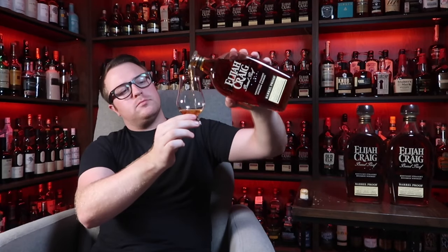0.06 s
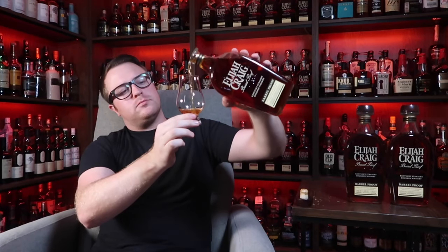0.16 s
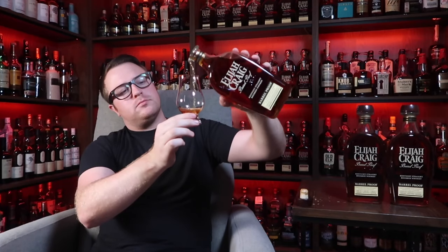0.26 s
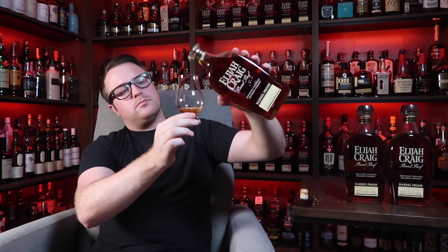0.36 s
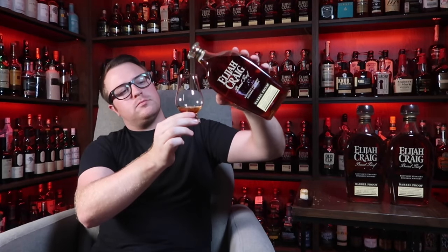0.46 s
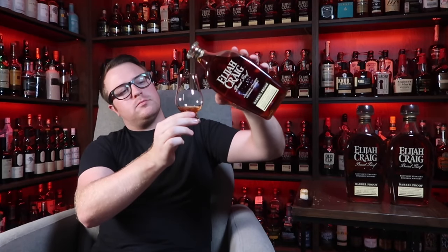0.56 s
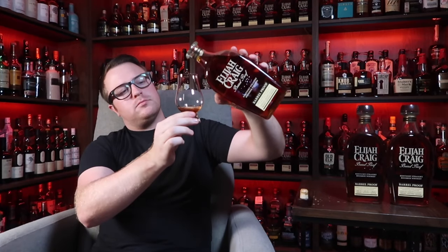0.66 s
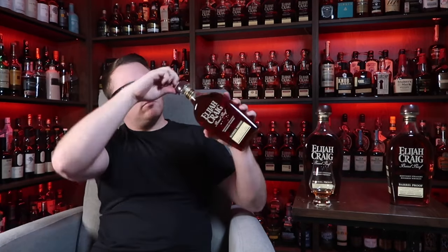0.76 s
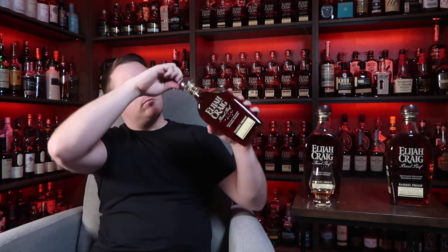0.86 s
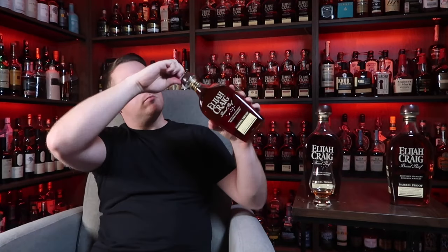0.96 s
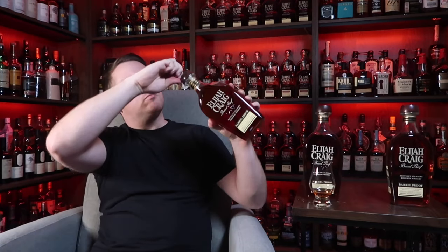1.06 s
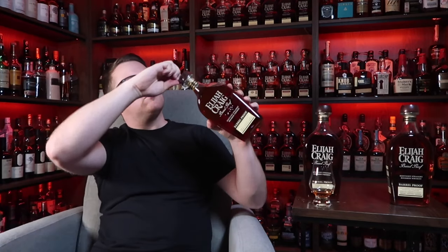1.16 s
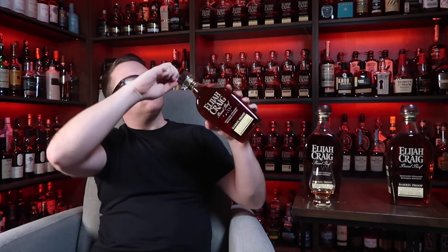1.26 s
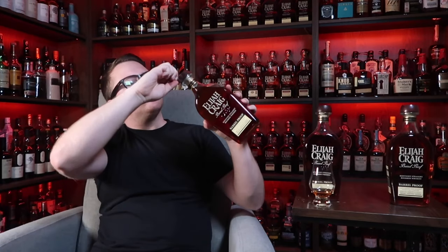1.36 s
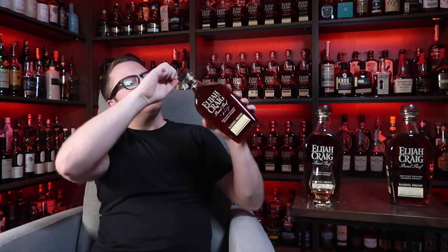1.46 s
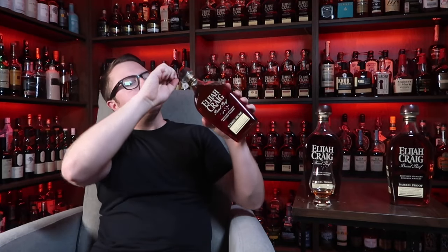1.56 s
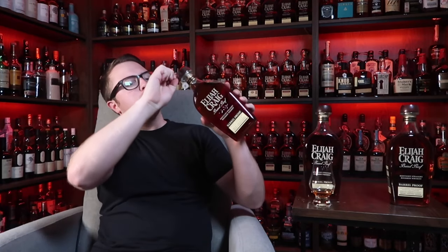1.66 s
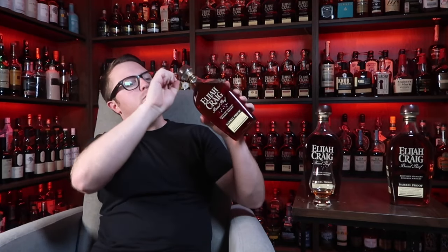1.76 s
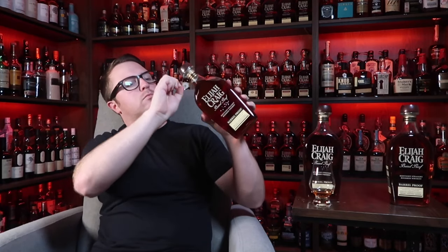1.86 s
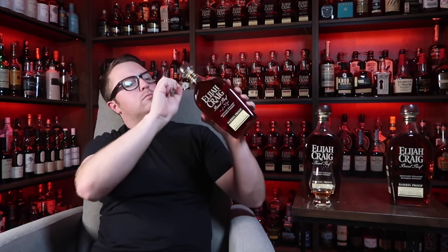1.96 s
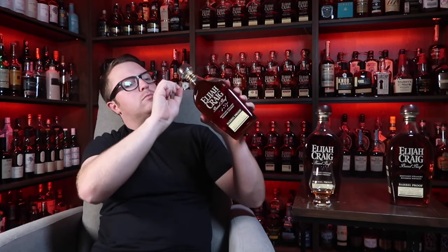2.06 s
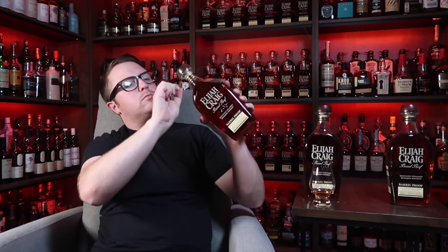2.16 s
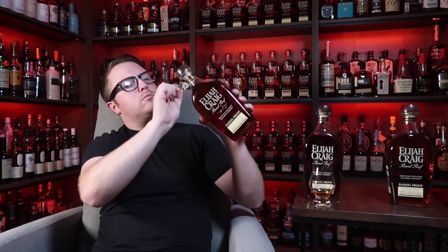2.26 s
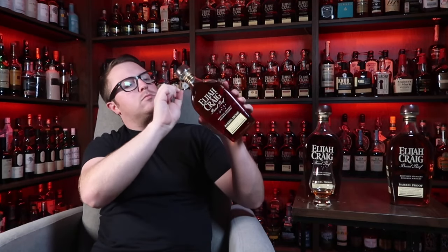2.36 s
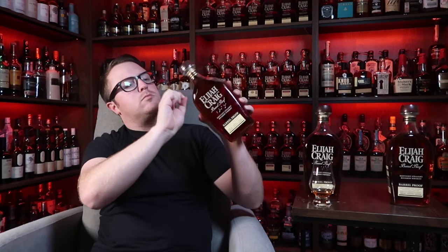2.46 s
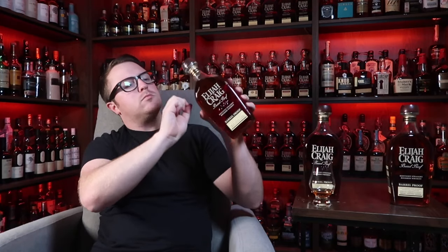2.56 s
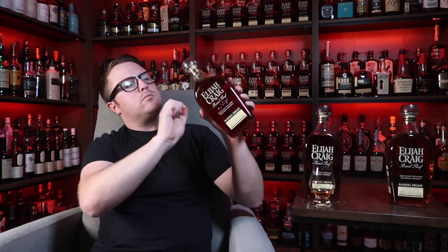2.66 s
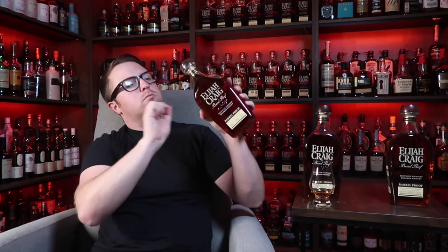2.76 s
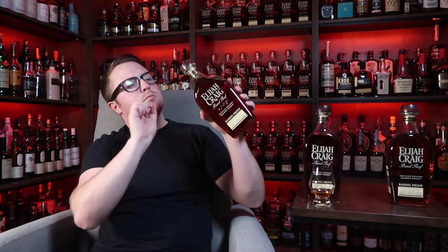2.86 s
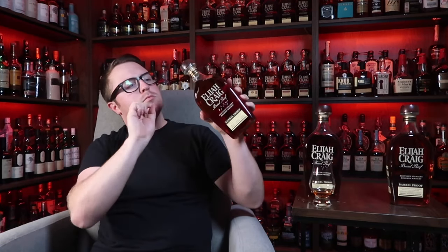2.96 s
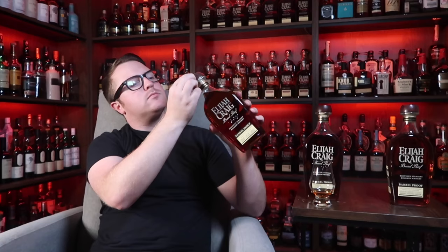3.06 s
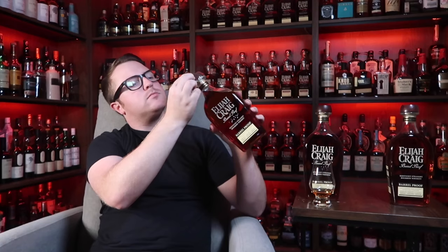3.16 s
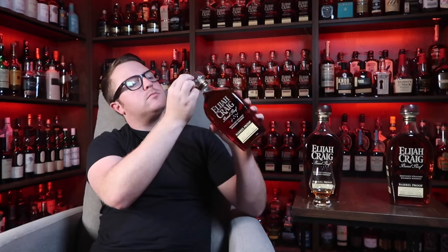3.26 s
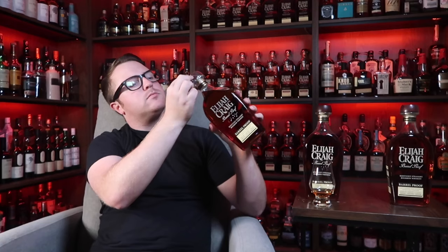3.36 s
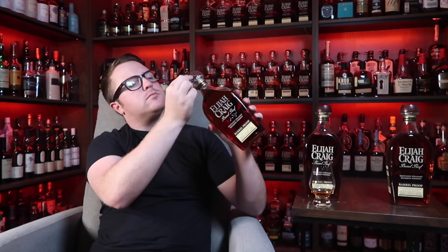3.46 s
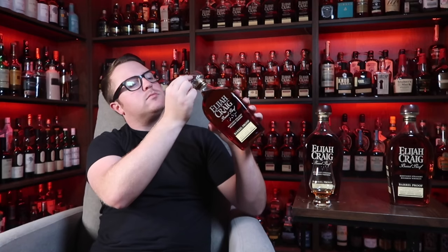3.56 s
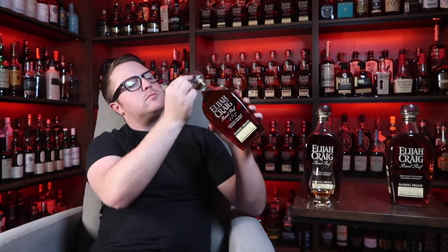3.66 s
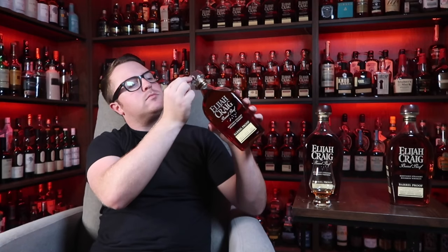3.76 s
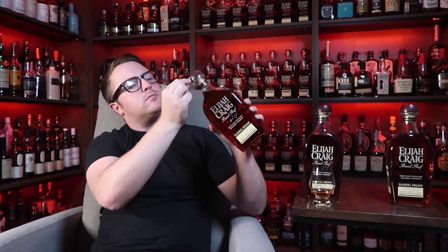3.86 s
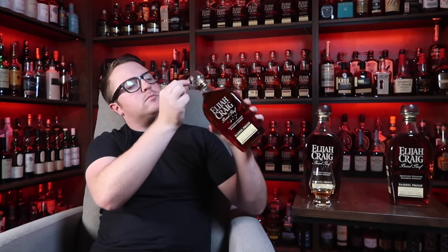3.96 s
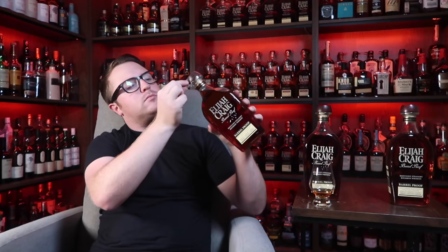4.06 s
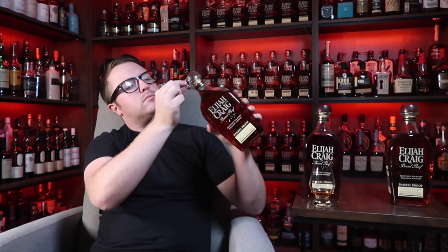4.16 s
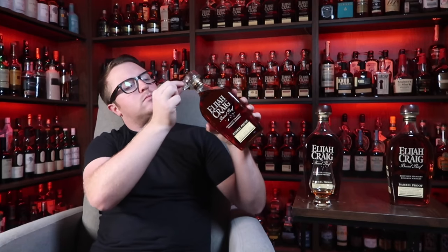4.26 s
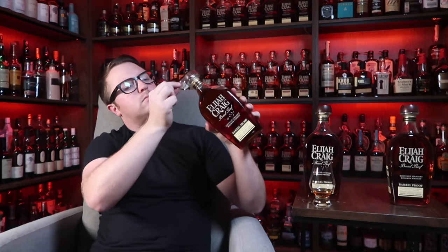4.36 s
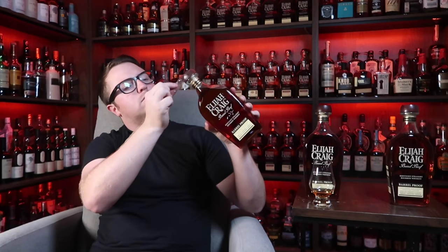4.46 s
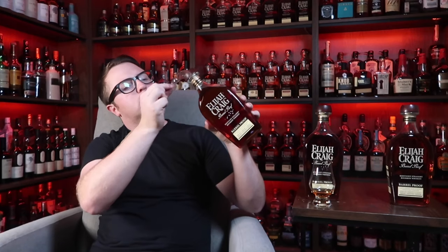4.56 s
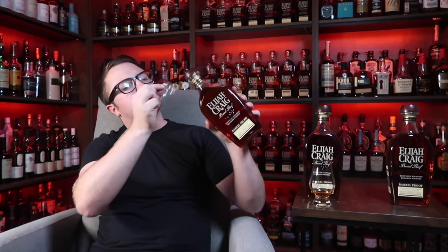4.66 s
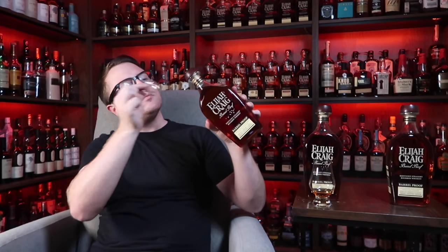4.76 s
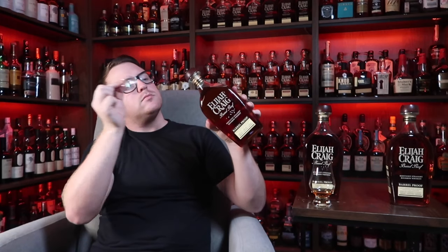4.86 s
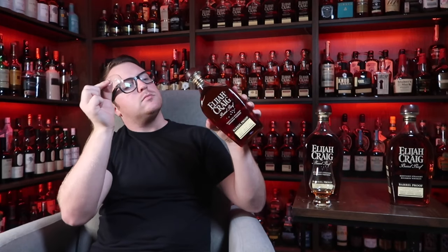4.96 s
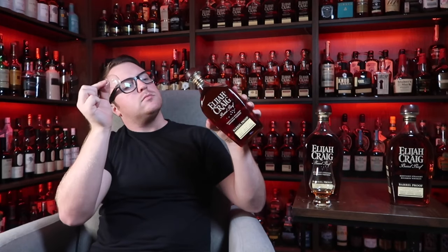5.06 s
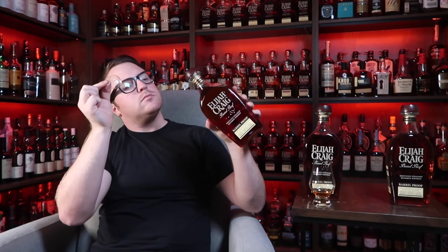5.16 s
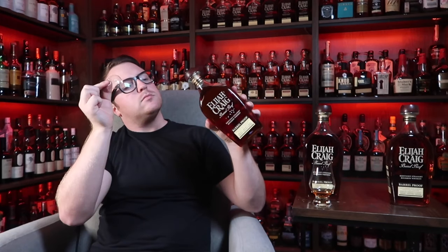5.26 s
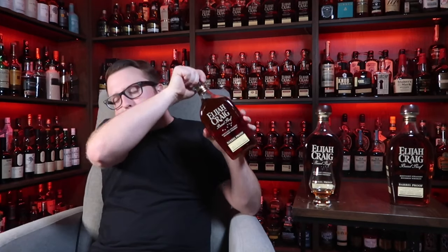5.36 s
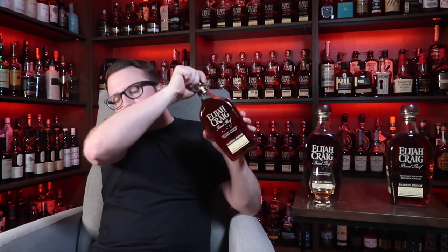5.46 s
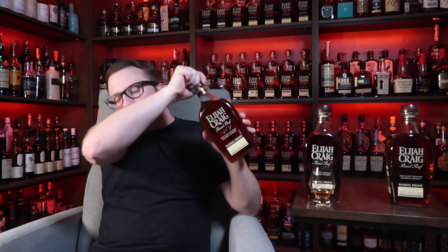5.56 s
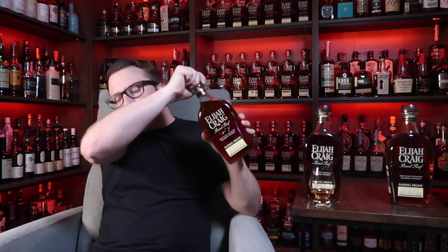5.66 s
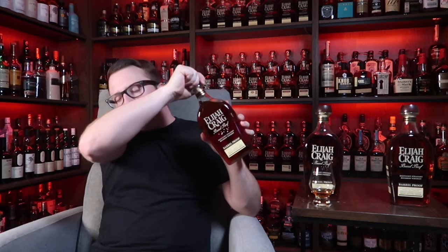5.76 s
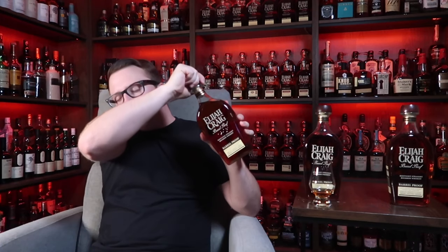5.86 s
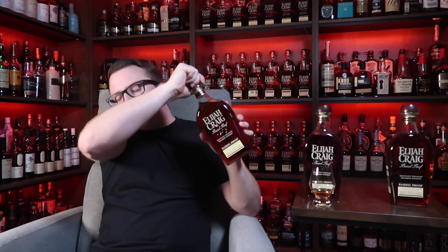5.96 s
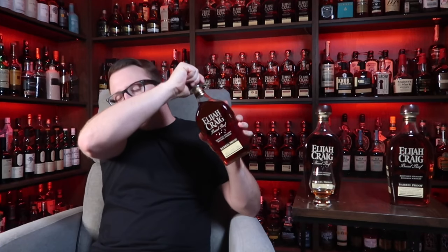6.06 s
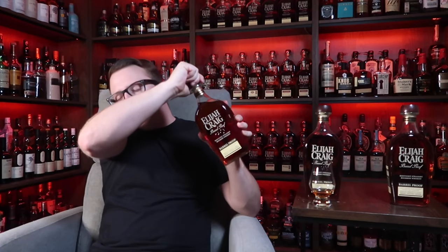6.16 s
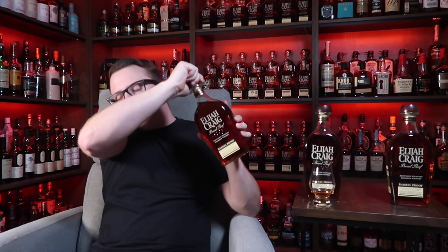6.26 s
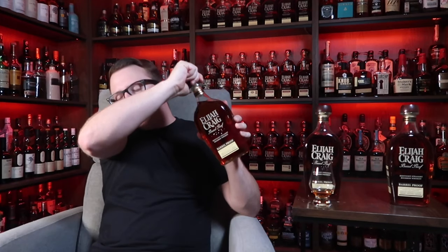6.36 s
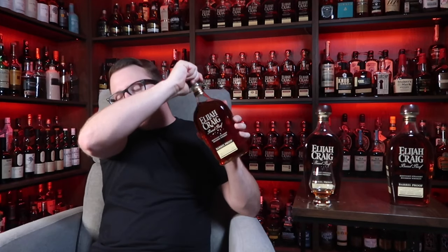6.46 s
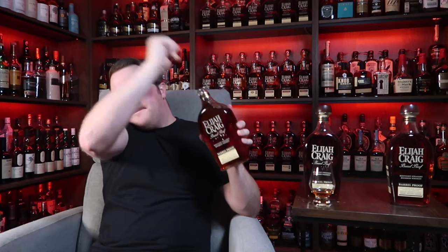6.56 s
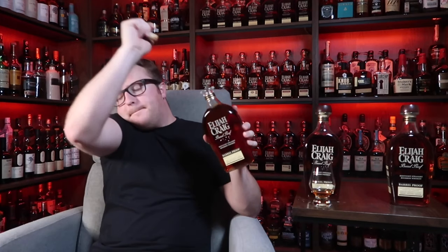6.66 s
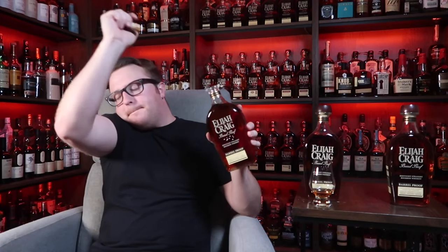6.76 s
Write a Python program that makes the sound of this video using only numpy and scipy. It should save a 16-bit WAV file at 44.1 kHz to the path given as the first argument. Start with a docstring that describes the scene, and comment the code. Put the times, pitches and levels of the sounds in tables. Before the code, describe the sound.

Whiskey finishes trickling into a glass with quiet bubbling and small glassy drips. Then fingers break a bottle's brittle seal: isolated ticks, a quick cluster, one hard snap, and later a dense crackling rip. After a quiet wait, a cork comes free with a loud rounded pop. The microphone is fairly near, in a small room with short reflections and faint background noise.

```python
"""A last few glugs of whiskey run from a bottle into a glass in a small shelf-lined room: ringing air
pockets, drops on the glass and fine bubbles. Then a bottle's seal is picked and torn open in sharp snaps,
tinks and crackling rips, all made of short resonant breaks, while a faint low tone comes and goes.
The cork is pulled: a scuff, a thump and a hollow pop whose neck tone rises and wakes the room's resonances,
with a faint drop-like tick and one more glug just after. Rumble and hiss lie under it all and dip three times."""
import sys
import numpy as np
from scipy import signal
from scipy.fft import rfft, irfft
from scipy.io import wavfile

SR = 44100
rng = np.random.default_rng(int(sys.argv[2]) if len(sys.argv) > 2 else 0)


def materialize(psi):
    """Save the field psi as 16-bit PCM at rate SR to the path in sys.argv[1].

    A 1-D psi becomes a single channel; in a 2-D psi each row is a channel.
    """
    bounded = np.clip(np.atleast_2d(psi).T, -1, 1)
    quanta = np.round(bounded * 32767).astype(np.int16)
    wavfile.write(sys.argv[1], SR, quanta)


N = 299880
TIME = np.arange(N) / SR   # s
POP_S = 6.5655   # the cork leaves the neck

# Breaks of the seal, and last a faint drop-like tick after the pop:
# start_s, level_db, centre_hz, width_hz, room_db (room send against the snap)
SNAP_EVENTS = [(0.9785, -26.5, 3680, 7000, 0), (1.1654, -44, 5000, 5000, -3),
               (1.1928, -43.5, 3900, 5000, 0), (1.2293, -24.5, 3240, 4300, 1.5),
               (1.3788, -23, 2600, 6000, -4), (1.59, -25.5, 2510, 4600, -3), (1.762, -40.5, 2420, 4380, 2),
               (1.7962, -19, 2600, 4200, -6), (1.8105, -21.5, 2840, 4000, -0.5),
               (1.8295, -27.5, 3600, 4500, 6), (1.8374, -19.5, 3080, 3600, -3),
               (1.8534, -25.5, 2300, 2000, 1.5), (1.8613, -23, 3800, 5000, 4),
               (1.8718, -28, 2330, 1200, 0.5), (2.4227, -26.5, 2800, 3200, 6),
               (2.4393, -12, 2040, 3040, -2.5), (3.0766, -34, 3730, 5760, -1.5),
               (3.8371, -30, 3100, 4330, -5.5), (3.8922, -39, 2570, 2400, -3.5),
               (3.904, -42, 3000, 1800, -6), (3.9624, -22, 3900, 2100, -2.5),
               (4.1038, -43.5, 6040, 4500, 1.5), (4.2613, -38.5, 2780, 2800, -6),
               (4.287, -25, 3040, 2200, -2), (4.292, -26.5, 2820, 2000, -10),
               (4.3117, -22, 3450, 1710, -5.5), (4.3524, -26, 3400, 2200, -1),
               (4.3575, -23, 3160, 1200, -21), (4.3869, -30, 3300, 2200, -8),
               (4.455, -26.5, 2540, 1610, -8), (4.4898, -23, 3800, 1300, -3), (4.5465, -18, 2620, 3560, -7),
               (4.572, -32.5, 3860, 4800, 4), (4.604, -26.5, 2970, 3200, 2), (4.669, -27, 2100, 1510, 7.5),
               (4.6817, -17, 2650, 2200, -6), (4.695, -27, 3220, 2600, 1),
               (4.7214, -11.5, 2050, 2200, -7.5), (4.7307, -24, 3300, 5000, 8.5),
               (6.7123, -44, 6770, 2400, 2)]


def from_db(db):
    """Decibels to amplitude."""
    return 10 ** (np.asarray(db) / 20)


def rms_one(x):
    """Scale a signal to an RMS of one."""
    return x / np.sqrt(np.mean(x ** 2) + 1e-20)


def at_hz(points, hz):
    """Read a two-column curve on a log-frequency axis."""
    points = np.array(points)
    return np.interp(np.log(hz + 1e-9), np.log(points[:, 0]), points[:, 1])


def colour(x, spectrum):
    """Give a signal a spectrum of levels in dB."""
    size = x.shape[-1]
    gain = from_db(at_hz(spectrum, np.fft.rfftfreq(size, 1 / SR)))
    return irfft(rfft(x) * gain, size)


def cut(x, hz, kind, order=2):
    """Causal Butterworth filter."""
    sos = signal.butter(order, np.clip(hz, 10, SR * .45), kind, fs=SR, output="sos")
    return signal.sosfilt(sos, x)


def add(out, s, sound):
    """Mix a sound in at a time."""
    at = round(s * SR)
    out[at:at + len(sound)] += sound[:N - at]


def dying(t, t60):
    """Exponential decay that falls 60 dB in t60 seconds."""
    return from_db(-60 * t / t60)


def ringing(hz, db, t60, t):
    """One resonance after a blow: a decaying sine."""
    return from_db(db) * np.sin(2 * np.pi * hz * t) * dying(t, t60)


def struck(modes, t=TIME[:SR // 6]):
    """Several resonances (pitch_hz, level_db, t60_s) set ringing by one blow."""
    return sum(ringing(hz, db, t60, t) for hz, db, t60 in modes)


def stereo_noise(width, size):
    """White noise in two channels, its side share set by frequency."""
    mid, side = rfft(rng.standard_normal((2, size)))
    ratio = from_db(at_hz(width, np.fft.rfftfreq(size, 1 / SR)))
    left_right = mid + ratio * side * [[1], [-1]]
    return irfft(left_right / np.sqrt(1 + ratio ** 2), size)


def film_break(kick, hz, width, leak=0.3, leak_width_hz=2800, low_hz=350, top_hz=8000):
    """Two passes of one resonance ring the film; part of the kick leaks past the second."""
    r = np.exp(-np.pi * width / SR)
    b = (1 - r * r) / 2 * np.array([1, 0, -1])
    a = [1, -2 * r * np.cos(2 * np.pi * hz / SR), r * r]
    once = signal.lfilter(b, a, kick)
    # tight rings leak less
    body = signal.lfilter(b, a, once) + leak * (width / leak_width_hz) ** 2 * once
    body = cut(cut(body, top_hz, "low"), low_hz, "high", order=1)
    return body / np.abs(body).max()


def snaps(crack_hz=7000, hand_hz=6500, count=5):
    """Each break rings the film under a bright crack, hard ones thud in the neck; direct and room sends."""
    crack_db, crack_width_hz, crack_db_per_octave = 2.5, 3520, 5.5
    # the hardest snap's thud; dB of thud per dB of snap
    thud_db, thud_growth, thud_hz, thud_t60, thud_low_hz = -18.5, 2.74, 1166, 0.0034, 800
    direct, sent = np.zeros(N), np.zeros((count, N))
    kick = signal.unit_impulse(SR // 6) + 1e-18
    crack = cut(kick, crack_hz, "high")
    thud = cut(struck([(thud_hz, thud_db, thud_t60)]), thud_low_hz, "high")
    hardest_db = max(row[1] for row in SNAP_EVENTS)
    for k, (s, db, hz, width, room_db) in enumerate(SNAP_EVENTS):
        # shorter, broader snaps crack brighter
        bright_db = crack_db + crack_db_per_octave * np.log2(width / crack_width_hz)
        snap = from_db(db) * (film_break(kick, hz, width) + from_db(bright_db) * crack)
        snap = snap + from_db(thud_growth * (db - hardest_db)) * thud
        add(direct, s, cut(snap, hand_hz, "low"))   # the hand shades the treble on the direct path
        # the fingers turn each snap toward or away from the microphone;
        # snaps are dealt in turn to several room responses
        add(sent[k % count], s, from_db(room_db) * snap)
    return direct, sent


def bottle_ring(scatter_db):
    """Every snap strikes each mode of the bottle with a strength of its own."""
    # Faint modes of the bottle: pitch_hz, level_db (against the snap's level_db), t60_s
    bottle_modes = [(277, -54, 0.66), (502.5, -56.5, 0.18), (542, -50.5, 0.39), (1250, -58, 0.13),
                    (2220, -49, 0.3), (2200, -31, 0.16), (2690, -45.5, 0.29), (2590, -42, 0.39),
                    (2650, -45, 0.26), (2970, -47, 0.51), (3300, -35, 0.11), (3730, -38, 0.12),
                    (5300, -42, 0.12)]
    out, t = np.zeros(N), TIME[:SR // 3]
    luck = rng.normal(0, scatter_db, (len(SNAP_EVENTS), len(bottle_modes)))
    modes = np.array([ringing(hz, db, t60, t) for hz, db, t60 in bottle_modes])
    for (s, db, *_), strengths in zip(SNAP_EVENTS, luck):
        add(out, s, from_db(db + strengths) @ modes)
    return out


def crackle(per_s, spread_db, count=7):
    """Dense tiny breaks of uneven size, each ringing briefly in a band of its own."""
    # Spectrum of the tearing film: frequency_hz, level_db (relative)
    tear_colour = [(150, -17.5), (500, -8), (1200, -2), (2000, 1.5), (3000, 1.5), (4000, 4), (6000, -10),
                   (10000, -17.5), (16000, -37)]
    sizes = from_db(spread_db * np.minimum(rng.exponential(1, N), 4)) * rng.choice([-1, 1], N)
    clicks = sizes * (rng.random(N) < per_s / SR)
    dealt = rng.integers(0, count, N)
    edges = np.geomspace(900, 16000, count + 1)   # Hz
    grains = sum(cut(clicks * (dealt == k) + 1e-18, edges[k:k + 2], "band") for k in range(count))
    grains = grains + cut(clicks, edges[0], "low") / np.sqrt(count)   # all share a dull body
    return rms_one(colour(grains, tear_colour))


def rips(treble_hz=5500, attack_s=0.0016, release_s=0.017):
    """Each pull of the fingers catches, swells or fades evenly in dB while the film runs, and stops."""
    # Pulls: start_s, length_s, level_db (at the start), swell_db (over the pull), treble_lift_db
    pulls = [(1.793, 0.07, -43.5, 0, 9.5), (1.969, .01, -47.5, 1.5, 11), (2.421, 0.034, -49, 14.5, -5),
             (3.779, .12, -70.5, 13, -8), (4.181, 0.13, -73, 7, -8), (4.312, 0.15, -47.5, -9.5, -4),
             (4.474, 0.067, -52, -0.5, 2), (4.544, .12, -44, -5.5, 4), (4.669, 0.08, -45.5, 10, 9),
             (4.777, 0.17, -70, 1, 4)]
    out, grains = np.zeros(N), crackle(per_s=1700, spread_db=4.0)
    treble = cut(grains, treble_hz, "high", order=1)
    for s, length, db, swell_db, lift_db in pulls:
        t = TIME - s
        # exponential rise before the start and fall after the end
        edges = np.minimum(t, 0) / attack_s - np.maximum(t - length, 0) / release_s
        strength = from_db(db + swell_db * np.clip(t / length, 0, 1)) * np.exp(np.maximum(edges, -20))
        out += strength * rms_one(grains + (from_db(lift_db) - 1) * treble)
    return out


def tinks(crack_db=11, crack_hz=5000, low_hz=1700, top_hz=12000):
    """A flick of the stiff seal's edge: a bright tick and a short ring whose pitch depends on the grip."""
    # Flicks: start_s, level_db, pitch_hz
    flicks = [(1.9736, -38, 2595), (2.373, -33.5, 2253)]
    # Modes of the edge: pitch_multiple, level_db (against the flick), t60_s
    edge_modes = [(1.001, -13.5, .07), (1.42, -7.5, .008), (1.959, -4.5, 0.024)]
    out = np.zeros(N)
    for s, db, pitch in flicks:
        ring = struck([(pitch * multiple, level_db, t60) for multiple, level_db, t60 in edge_modes])
        tick = cut(signal.unit_impulse(len(ring)) + 1e-18, crack_hz, "high")
        add(out, s, from_db(db) * (ring + from_db(crack_db) * tick))
    return cut(out, [low_hz, top_hz], "band")


def cork_pop(neck_hz=822.3, tone_db=-15, crest_s=0.013, swell_s=0.014, flat=0.21, clear_s=0.0027):
    """The air in the neck rings, rising to neck_hz as the cork clears the mouth."""
    # Overtones of the neck: pitch_hz, level_db, t60_s
    overtones = [(2670, -42.5, 0.19), (2716, -38, 0.1), (4170, -36, 0.057), (4880, -55, 0.09),
                 (5470, -54, 0.12), (6460, -63, 0.079), (7865, -76, .1)]
    out, t = np.zeros(N), TIME[:SR // 3]
    hz = neck_hz * (1 - flat * np.exp(-t / clear_s))   # starts flat by this share
    swell = np.exp(-((t - crest_s) / swell_s) ** 2)
    add(out, POP_S, from_db(tone_db) * np.sin(2 * np.pi * np.cumsum(hz) / SR) * swell)
    add(out, POP_S, struck(overtones, t))
    return out


def suction(db=-15, length_s=0.00064, lead_s=0.00029, low_hz=120):
    """The vacuum behind the cork collapses in one low thump."""
    pulse = -from_db(db) * np.exp(-((TIME - POP_S + lead_s) / length_s) ** 2)
    return cut(pulse, low_hz, "high")


def cork_slip(db=-42, lead_s=0.0024, length_s=0.0018, low_hz=1100, high_hz=5500):
    """The cork scuffs the glass as it lets go: a brief swell of band-passed noise."""
    scuff = rms_one(cut(rng.standard_normal(N), [low_hz, high_hz], "band"))
    return from_db(db) * scuff * np.exp(-((TIME - POP_S + lead_s) / length_s) ** 2)


def glugs(rise=0.25, onset_s=0.001, cycles=35):
    """Air gulped by the pouring bottle: pockets ring for some cycles and rise a little in pitch."""
    # Air pockets: start_s, level_db, pitch_hz (at the start)
    pockets = [(.002, -49, 794), (.022, -55, 764), (.058, -50, 745), (.083, -48, 723), (.268, -49, 970),
               (.306, -43, 887), (.319, -44, 783), (.341, -45, 994), (6.724, -41.5, 966)]
    out, t = np.zeros(N), TIME[:SR // 6]
    for s, db, hz in pockets:
        tone = np.sin(2 * np.pi * hz * t * (1 + rise * t))
        add(out, s, from_db(db) * tone * dying(t, cycles / hz) * (1 - np.exp(-t / onset_s)))
    return out


def drips():
    """Every drop wakes the same short ring in the glass."""
    # Drops: start_s, level_db
    drops = [(.099, -49), (0.178, -55), (.2, -58), (.232, -61), (.336, -44.5)]
    # Modes of the glass: pitch_hz, level_db (against the drop), t60_s
    glass_modes = [(1400, -17, 0.032), (2004, -13, 0.058), (2980, 1, 0.016), (3300, -6, 0.054),
                   (4400, -20, 0.063), (6630, -23, .028)]
    out, ring = np.zeros(N), struck(glass_modes)
    for s, db in drops:
        add(out, s, from_db(db) * ring)
    return out


def fine_bubbles(low_hz=1300, high_hz=6500, cycles=25, spread_db=14, count=300):
    """The stream beats small bubbles into the glass, each a short rising ping."""
    # Loudness of the stream in the glass: time_s, level_db
    stream = [(0, -80), (.1, -74), (.2, -72.5), (.34, -68.5), (.41, -73.5), (.47, -100), (6.8, -100)]
    out, t = np.zeros(N), TIME[:SR // 20]
    for when, a, b, strength in rng.random((count, 4)):
        hz = low_hz * (high_hz / low_hz) ** ((a + b) / 2)   # middle sizes are the commonest
        ping = np.sin(2 * np.pi * hz * t * (1 + t)) * dying(t, cycles / hz)
        add(out, when * .5, from_db(spread_db * strength) * ping)
    stream_s, stream_db = np.transpose(stream)
    return from_db(np.interp(TIME, stream_s, stream_db)) * out / out[:SR // 2].std()


def low_tone(waver=0.62, wander=0.027):
    """A soft tone, unsteady in loudness and pitch, swells and fades just above the room noise."""
    # Swells of the tone: start_s, length_s, level_db (before the waver), pitch_hz (mean)
    swells = [(2.522, 0.25, -67, 387), (2.758, .22, -65, 380), (3.08, 0.23, -72, 330)]
    out = np.zeros(N)
    loudness, pitch = (rms_one(cut(noise, 25.6, "low")) for noise in rng.standard_normal((2, N)))
    for s, length, db, hz in swells:
        swell = np.sqrt(np.abs(np.sin(np.pi * np.clip((TIME - s) / length, 0, 1))))
        phase = 2 * np.pi * np.cumsum(hz * (1 + wander * pitch)) / SR
        out += from_db(db) * swell * np.sin(phase)
    return out * (1 + waver * loudness)


def near_echo(x, db=-7, low_hz=2500, delay_s=.0056):
    """One hard surface nearby throws back a bright copy."""
    late = np.interp(TIME - delay_s, TIME, x)
    return from_db(db) * cut(late, low_hz, "high", order=1)


def pop_bloom():
    """Low room resonances build up after the pop and ring on."""
    # Room resonances woken by the pop: pitch_hz, level_db (before build-up), t60_s, build_up_s
    room_modes = [(215.6, -34.5, .15, .003), (264, -27, 0.084, 0.0035), (320, -34.5, 0.17, 0.0083),
                  (386, -30.5, 0.1, 0.007), (533, -16.5, 0.28, 0.23), (643, -24.5, 0.13, 0.022),
                  (705, -24, 0.16, 0.012), (762, -26, 0.2, 0.024), (812, -20, 0.24, 0.026),
                  (840, -37.5, 0.46, 0.027)]
    out, t = np.zeros(N), TIME[:SR // 3]
    for hz, db, t60, build_s in room_modes:
        add(out, POP_S, ringing(hz, db, t60, t) * (1 - np.exp(-t / build_s)))
    return out


def room_tail(build_s=0.002):
    """Diffuse response of the shelves and walls: noise dying band by band."""
    # Spectrum of the tail: frequency_hz, level_db (relative)
    tail_colour = [(100, 1.5), (300, 6), (600, 9), (1000, 2.5), (1700, 8.5), (2400, 2), (3000, 8.5),
                   (4200, 0.5), (6000, 10), (10000, 13.5), (16000, -7)]
    # Decay of the tail: frequency_hz, t60_s
    tail_t60 = [(100, 0.39), (600, 0.22), (2000, 0.2), (5000, 0.21), (10000, 0.16), (16000, 0.086)]
    # Stereo width of the tail: frequency_hz, side_minus_mid_db
    tail_width = [(60, -15.5), (300, -29.5), (1200, -19), (2400, -32), (4400, -3), (8000, 6), (15000, 7.5)]
    t = TIME[:SR // 2]
    noise, tail = colour(stereo_noise(tail_width, len(t)), tail_colour), 0
    edges = np.geomspace(60, 17000, 11)   # Hz
    for low, high in zip(edges, edges[1:]):
        tail = tail + cut(noise, [low, high], "band") * dying(t, at_hz(tail_t60, np.sqrt(low * high)))
    tail = tail * (1 - np.exp(-t / build_s))
    return tail / np.sqrt(np.sum(tail ** 2) / 2)   # unit energy per channel on average


def in_room(x):
    """The diffuse sound of a source; each call draws a new random room response."""
    return signal.fftconvolve(x[None], room_tail(), axes=1)[:, :N]


def background(level_db=-64, dip_db=-17.5, dip_half_width_s=0.015):
    """Steady rumble and hiss of the room, shaped noise dipping briefly three times."""
    # Spectrum of the room noise: frequency_hz, level_db (relative)
    floor_colour = [(12, -44), (20, -16.5), (70, -1), (110, -5.5), (138, -4.5), (255, -9.5), (301, -9.5),
                    (377, -10.5), (434, -10), (485, -10.5), (825, -16), (923, -14), (11800, -33),
                    (13500, -54.5), (16000, -57)]
    # Stereo width of the room noise: frequency_hz, side_minus_mid_db
    floor_width = [(60, -17), (110, -24.5), (200, -1), (380, -0.5), (700, 2), (1290, 3.5), (2380, 0.5),
                   (4400, 0.5), (8120, 3), (15000, 8)]
    # Centres of the dips: time_s
    dip_times = [.762, 3.03, 5.397]
    dips = dip_db * sum(np.exp(-((TIME - s) / dip_half_width_s) ** 2) for s in dip_times)
    return from_db(level_db + dips) * rms_one(colour(stereo_noise(floor_width, N), floor_colour))


def scene(snap_wet_db=1.5, tear_wet_db=-1.5, tink_wet_db=6, pour_wet_db=-3,
          pop_wet_db=-21, thump_wet_db=-5, slip_wet_db=4, pop_low_hz=160):
    """Pour, seal and cork, each with its own share of room."""
    snap, snap_sent = snaps()
    tear, tink = rips(), tinks()
    pour = glugs() + drips() + fine_bubbles()
    pop, thump, slip = cut(cork_pop(), pop_low_hz, "high"), suction(), cork_slip()
    room = from_db(snap_wet_db) * sum(in_room(sent) for sent in snap_sent)
    room = room + in_room(from_db(tear_wet_db) * tear + from_db(tink_wet_db) * tink
                          + from_db(pour_wet_db) * pour)
    cork_sent = from_db(pop_wet_db) * pop + from_db(thump_wet_db) * thump + from_db(slip_wet_db) * slip
    room = room + in_room(cut(cork_sent, pop_low_hz, "high", order=1))
    direct = snap + bottle_ring(scatter_db=4.0) + tear + tink + pour + pop + thump + slip
    echo = near_echo(snap_sent.sum(axis=0) + tear + tink)
    return direct + echo + pop_bloom() + low_tone() + room + background()


def record(dry, cutoff_hz=16100):
    """The top is cut steeply by an elliptic low-pass."""
    return signal.sosfilt(signal.ellip(10, .2, 80, cutoff_hz, fs=SR, output="sos"), dry)


dry = scene()
out = record(dry)
materialize(out)
```